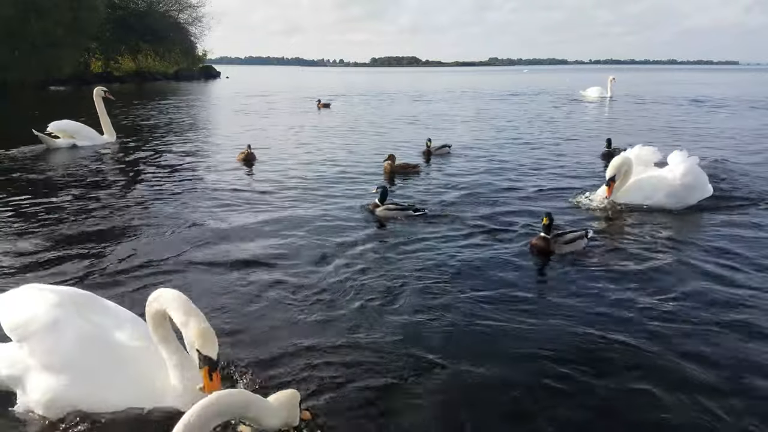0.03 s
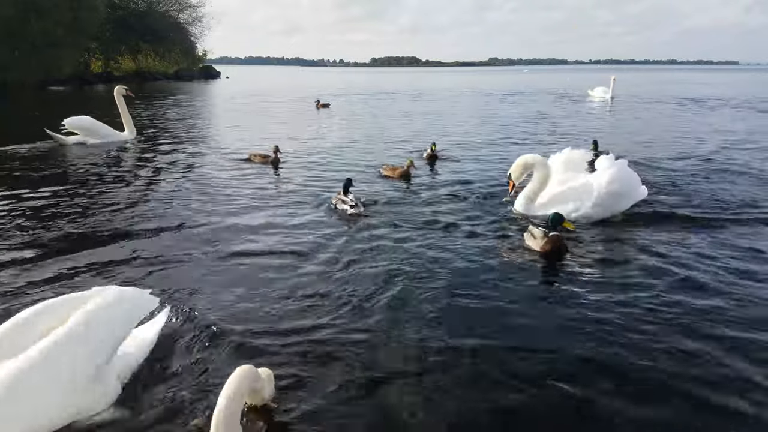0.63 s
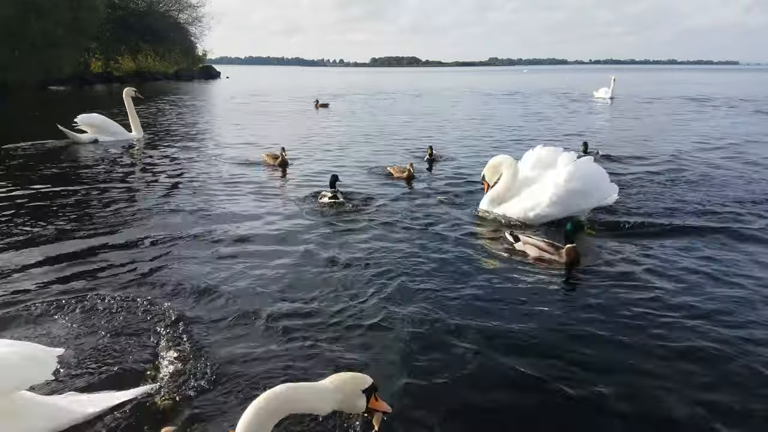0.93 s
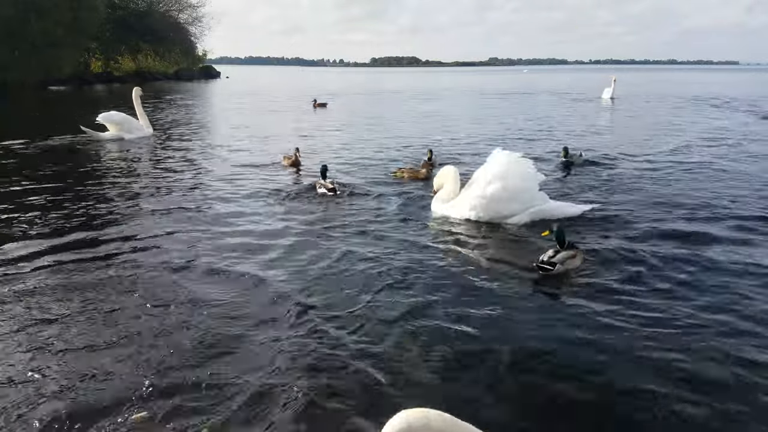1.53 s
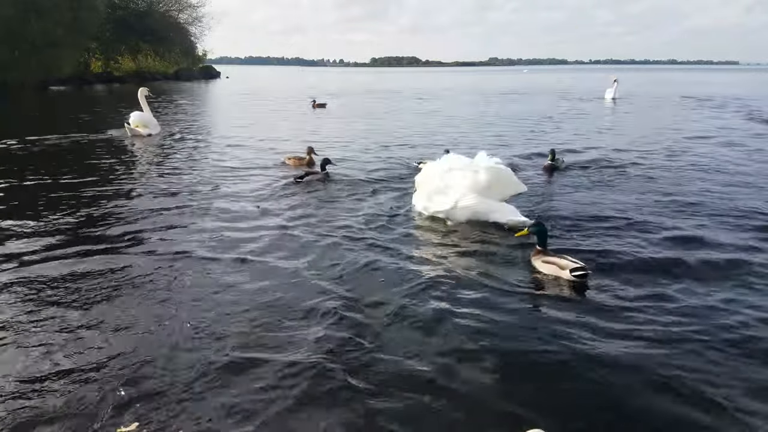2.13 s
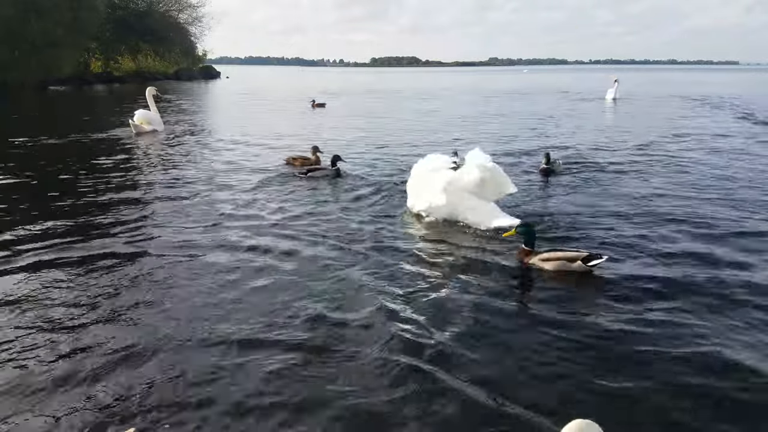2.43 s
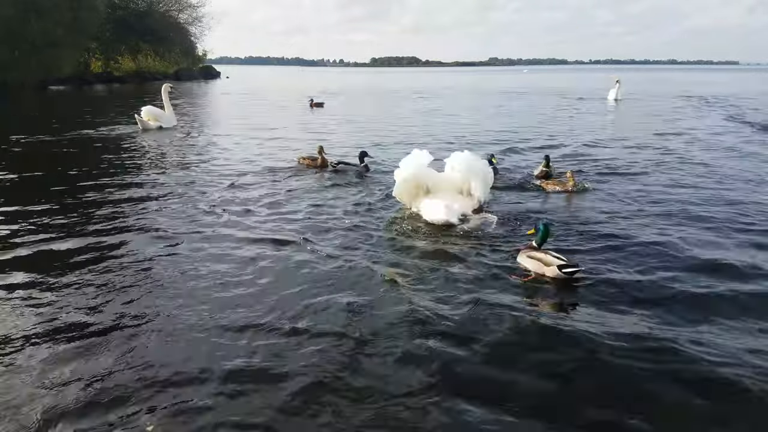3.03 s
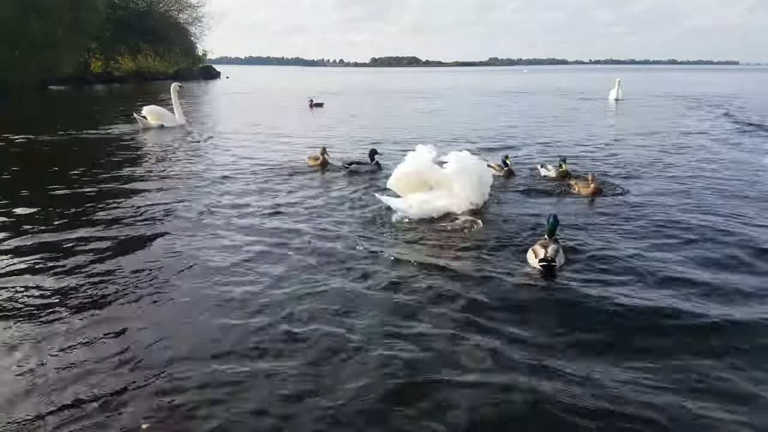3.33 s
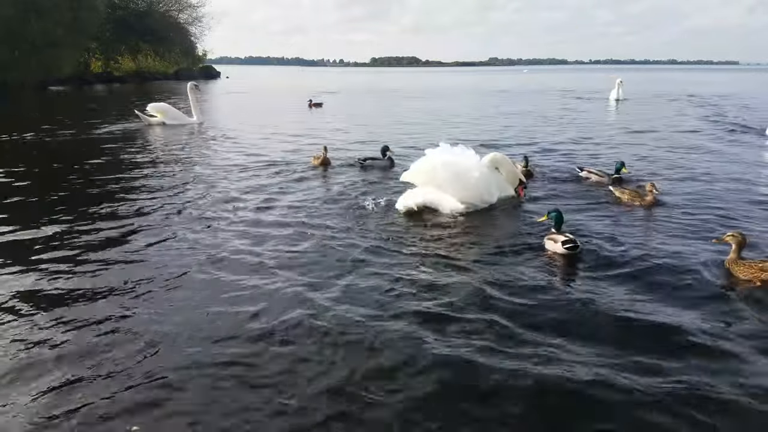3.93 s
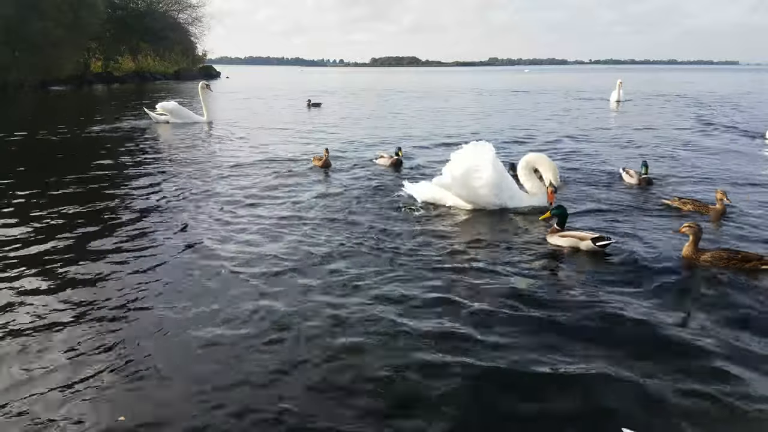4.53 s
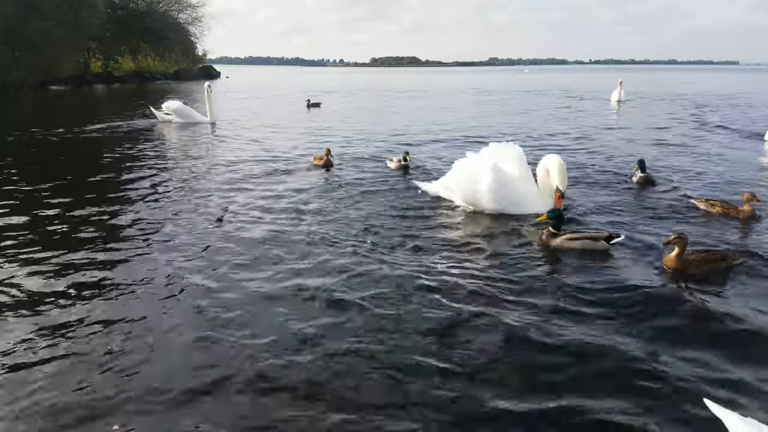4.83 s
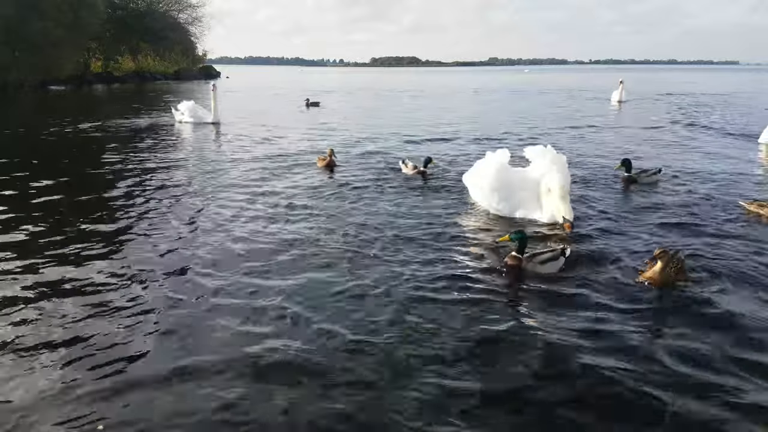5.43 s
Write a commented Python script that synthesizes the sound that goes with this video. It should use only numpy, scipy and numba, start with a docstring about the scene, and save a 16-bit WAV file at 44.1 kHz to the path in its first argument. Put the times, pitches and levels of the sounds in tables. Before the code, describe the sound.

Lake water sloshes, plops and drips around swimming swans, with a far-off motor throbbing and a few soft duck mutters late on.

```python
"""A swan paddles and splashes close by on the left of a stereo microphone pair at a lake shore, then glides off.
Small waves lap a little to the right. The water sounds through bubbles that ring and rise in pitch,
slaps that trap air, and a fine crackle of droplets. Late on, a duck mutters in soft throat pulses.
A low throbbing drone, like a distant idling boat engine, swells and fades underneath,
with faint air hiss and a light breeze on the microphones."""
import sys
import numpy as np
from scipy import signal
from scipy.fft import rfft, irfft, next_fast_len
from scipy.io import wavfile
from scipy.ndimage import uniform_filter1d, map_coordinates
from numba import njit

SR = 44100
rng = np.random.default_rng(int(sys.argv[2]) if len(sys.argv) > 2 else 0)


def transcribe(signal):
    """Save signal, clipped to [-1, 1], as a 16-bit WAV file at the path in sys.argv[1]."""
    frames = np.atleast_2d(signal).T
    limited = np.clip(frames, -1, 1)
    pcm = np.round(limited * 32767).astype(np.int16)
    wavfile.write(sys.argv[1], SR, pcm)


N = 250488
TIME = np.arange(N) / SR
SWAN_LAG_MS, SHORE_LAG_MS = -.32, .1   # arrival at the left microphone after the right
CUTOFF_HZ = 16000


# how hard the water in front of the microphones is stirred: t/s, bubbling level/dB, spray level/dB
STIRRING = [(0.0, -45.5, -57), (0.14, -49, -60), (0.41, -53, -62), (0.65, -54.5, -64), (0.87, -46, -52.5),
            (1.2, -53.5, -59.5), (1.55, -51.5, -59.5), (1.75, -52.5, -65), (2.12, -57, -61.5),
            (2.8, -52, -57.5), (3.61, -56.5, -63), (3.94, -55, -58.5), (4.26, -61.5, -62), (4.9, -68, -71),
            (5.68, -65.5, -69)]
def churn(surge_db=2.23, surges_per_s=9):
    """Stirred water bubbles, sloshes and throws spray close by, surging with the ripples."""
    stir_db, spray_db = in_time(STIRRING)
    small_db = stir_db + 1.9 + surge_db * flutter(surges_per_s)
    large_db = -61 + 9.5 * swan_near(TIME) + .34 * (stir_db - stir_db.mean())
    large = gurgle(370, 950, cycles=27, rise=.55, spread_db=4, count=700)
    small = gurgle(850, 5200, cycles=32, rise=.18, spread_db=4.8, count=3400)
    trickle = gurgle(2200, 3800, cycles=50, rise=.12, spread_db=4, count=1500)   # spray falling back
    near = .8 * small + .75 * slosh()
    far = from_db(-13.5) * diffuse(BUBBLE_SPECTRUM)   # blurred wash of water farther out
    thrown = from_db(3.5) * spray() + from_db(-1 + surge_db * flutter(surges_per_s)) * trickle
    return from_db(large_db) * large + from_db(small_db) * (near + far) + from_db(spray_db) * thrown


# tone of bubbling water: f/Hz, level/dB
BUBBLE_SPECTRUM = [(190, 6), (330, -11), (376, -3.5), (463, 1), (636, 1.5), (1240, -0.5), (1940, -1),
                   (2190, -4.5), (2940, -6.5), (4500, -16), (5850, -18.5), (9900, -120)]
def gurgle(low_hz, high_hz, cycles, rise, spread_db, count):
    """A steady stream of bubbles of random size, pitch and ring length; level about 1."""
    when, pitch, climb = rng.random((3, count))
    size, damping = rng.standard_normal((2, count))
    born = when * N / SR
    hz = low_hz * (high_hz / low_hz) ** pitch
    height = from_db(at_hz(BUBBLE_SPECTRUM, hz) + spread_db * np.minimum(size, 2)) * hz / low_hz
    t60 = cycles / hz * from_db(4 * np.clip(damping, -2, 2))
    return evened(ring_bubbles(born, height, hz, t60, rise * climb, bearings(born)), seconds=.81)


def slosh(spurt_db=2.3, spurts_per_s=60):
    """Water tumbles at the swan and at the shore: spurts of bubbles too dense to tell apart; rms 1."""
    out, swan = np.zeros((2, N)), swan_share(TIME)
    for share, lag_ms in ((swan, SWAN_LAG_MS), (1 - swan, SHORE_LAG_MS)):
        spurts = rng.standard_normal(N) * from_db(spurt_db * np.minimum(flutter(spurts_per_s), 2))
        add(out, coloured(spurts * np.sqrt(share), BUBBLE_SPECTRUM), 0, lag_ms)
    return rms_one(out)


# tone of droplets at close range: f/Hz, level/dB
SPRAY_SPECTRUM = [(2000, -17), (3500, -4), (5200, -7), (7300, -5), (8450, -2), (9700, -6), (12900, -3),
                  (16000, -10.5)]
def spray(count=2600, spread_db=6, octaves=2):
    """Tiny droplets and bursting bubbles tick, each at its own pitch, over a fine fizz."""
    when, pitch, size = rng.random((3, count))
    born = when * N / SR
    hz = CUTOFF_HZ / 2 ** (octaves * pitch ** 1.5)
    height = from_db(spread_db * np.minimum(-np.log(1 - size), 2.6))
    t60 = .0016 * rng.uniform(.2, 1.8, count)
    ticks = ring_bubbles(born, height, hz, t60, np.zeros(count), bearings(born))
    crackle = evened(coloured(ticks, SPRAY_SPECTRUM), seconds=.25)
    fizz = diffuse(SPRAY_SPECTRUM) * from_db(3.5 * flutter(90))
    return .75 * (crackle + fizz) * from_db([[.5], [-.5]])   # a little louder on the swan's side


# large air pockets gulped under by paddling: t/s, level/dB, f/Hz
AIR_POCKETS = [(.05, -34.5, 488), (.44, -35.5, 546), (.655, -33, 840), (.815, -31.5, 603), (.965, -39, 806),
               (1.085, -41, 393), (1.16, -36, 554), (1.3, -41, 720), (1.535, -46, 710), (1.778, -38, 438),
               (3.284, -43, 401), (3.82, -41, 657)]
def glugs(cycles=52.6, rise=.6):
    """A big bubble rings low and glides upward as it rises."""
    s, level_db, hz = np.array(AIR_POCKETS).T.copy()
    return ring_bubbles(s, from_db(level_db), hz, cycles / hz, np.full(len(s), rise), bearings(s))


# slaps that trap one air pocket: t/s, relative level/dB, f/Hz, ring t60/s, smack offset/dB
SLAPS = [(0.1374, -24.5, 1990, 0.03, -4.5), (0.182, -23.5, 1020, 0.034, -7.5),
         (0.305, -25, 1100, 0.014, -16), (0.3366, -23.5, 1580, 0.014, -9), (0.521, -18.5, 1070, 0.014, -26),
         (0.681, -29, 710, 0.031, -12), (0.7792, -25, 594, 0.042, -6), (0.8265, -27.5, 597, 0.024, -4),
         (0.8934, -25, 665, 0.031, -23), (1.0362, -27, 3080, 0.02, -3), (1.056, -30.5, 3200, 0.022, -4),
         (1.675, -30, 1860, 0.014, -24), (1.6863, -29, 2150, 0.012, 0), (1.7209, -29, 1440, 0.018, -19),
         (1.757, -31.5, 1290, 0.012, 10.5), (1.7723, -29, 1014, 0.056, -3), (1.862, -34, 1680, 0.022, 8.5),
         (1.9255, -22, 740, 0.017, -4.5), (2.1147, -12, 1440, 0.01, -8), (2.137, -26.5, 1870, 0.045, -10),
         (2.1663, -25.5, 1420, 0.034, -7), (2.312, -22.5, 1390, 0.011, -3), (2.325, -30.5, 1660, 0.013, 3),
         (2.3545, -38, 1130, 0.01, 4), (2.4767, -25, 754, 0.014, -15), (2.664, -35, 1100, 0.01, 7.5),
         (2.8878, -33, 830, 0.03, 2.5), (3.269, -28.5, 1500, 0.0047, -0.5),
         (3.468, -30.5, 2470, 0.037, -23), (3.805, -29.5, 942, 0.052, -8.5),
         (4.4966, -34.5, 1210, 0.081, -0.5), (4.9222, -38.5, 1860, 0.015, -4.5),
         (5.2256, -43.5, 1960, 0.038, 1.5), (5.376, -30.5, 1475, 0.044, -12),
         (5.4636, -27.5, 1734, 0.045, -25), (5.6645, -27.5, 720, 0.01, -9)]
# tone of the smack: f/Hz, level/dB
SMACK_SPECTRUM = [(200, -30), (500, -4.5), (1000, -7), (1800, -1.5), (3000, -6), (4500, -12.5), (9000, -29),
                  (16000, -37)]
def plops(ring_gain_db=-5, smack_gain_db=1.5, rise=.17, spatter_t60=.028):
    """Water slaps shut with one push and a short spatter, and the trapped air rings."""
    s, level_db, hz, t60, smack_db = np.array(SLAPS).T.copy()
    lag_ms = SHORE_LAG_MS + .6 * (SWAN_LAG_MS - SHORE_LAG_MS) * swan_near(s)   # drawn toward the swan
    out = ring_bubbles(s, from_db(level_db + ring_gain_db), hz, t60, np.full(len(s), rise), lag_ms)
    t = TIME[:SR // 20]
    pushes = .41 * rng.standard_normal((len(s), len(t))) * from_db(-60 * t / spatter_t60)
    pushes[:, 0] = 2   # the push, ahead of its spatter
    peaks = from_db(level_db + smack_db + smack_gain_db)
    for k, smack in enumerate(coloured(pushes, SMACK_SPECTRUM)):
        add(out, smack / np.abs(smack).max() * peaks[k], s[k], lag_ms[k])
    return out


# the loudest drops hitting the lake: t/s, peak level/dB, left over right/dB
LOUD_DROPS = [(0.0353, -30, -4), (0.0574, -27, 3), (0.138, -23.5, 0), (0.1594, -30, 3), (0.255, -30.5, 3.5),
              (0.2994, -26, 3), (1.579, -31, 11), (1.7578, -26, -4), (1.8587, -29.5, -1), (1.9988, -27, -3),
              (2.2383, -35, 7), (2.369, -22, 3), (2.3883, -28, 2), (2.887, -27, -5), (3.7415, -31.5, -1),
              (3.8336, -27.5, 0), (3.9356, -30.5, 0), (4.0376, -29, 0), (4.7695, -36.5, 0), (5.225, -38, 0),
              (5.4163, -31.5, 0), (5.6657, -36.5, 12)]
def drops(drip_count=18, t60=.008):
    """A drop meets the surface with a bright tick; lesser drips fall at random, following the spray level."""
    drip_s = rng.random(drip_count) * N / SR
    drip_db = in_time(STIRRING, drip_s)[1] + 18.5
    drip_pan_db = rng.uniform(-9.6, 6, drip_count)
    rows = np.vstack([LOUD_DROPS, np.transpose([drip_s, drip_db, drip_pan_db])])
    out, t = np.zeros((2, N)), TIME[:SR // 40]
    ticks = coloured(rng.standard_normal((len(rows), len(t))) * from_db(-60 * t / t60), SPRAY_SPECTRUM)
    for tick, (s, peak_db, pan_db), lag_ms in zip(ticks, rows, bearings(rows[:, 0])):
        add(out, tick / np.abs(tick).max() * from_db(peak_db), s, lag_ms, pan_db)
    return out


def swan_near(s, leaves_s=1.11, fade_s=.16):
    """1 while the swan paddles close to the microphones, 0 once it has glided off."""
    return np.clip(1 - (s - leaves_s) / fade_s, 0, 1)


def swan_share(s, near=.6, away=.42):
    """Share of the bubbles that come from the swan's side."""
    return away + (near - away) * swan_near(s)


def bearings(born, scatter_ms=.066):
    """Lag in ms between the microphones: each bubble or drop comes from the swan or from the shore."""
    by_swan = rng.random(len(born)) < swan_share(born)
    return np.where(by_swan, SWAN_LAG_MS, SHORE_LAG_MS) + scatter_ms * rng.standard_normal(len(born))


@njit
def ring_bubbles(born, height, hz, t60, rise, lag_ms):
    """Each bubble is a dying sine whose pitch climbs by the share 'rise' as it nears the surface."""
    out = np.zeros((2, N))
    for k in range(len(born)):
        for mic in range(2):
            start = born[k] + (.5 - mic) * lag_ms[k] / 1000
            for i in range(max(0, int(start * SR) + 1), min(N, int((start + t60[k]) * SR))):
                t = i / SR - start
                age, turns = t / t60[k], hz[k] * t
                envelope = height[k] * min(1., 1.5 * turns) * np.exp(-6.9 * age)
                out[mic, i] += envelope * np.sin(2 * np.pi * turns * (1 + rise[k] * age / 2))
    return out


# wavelets folding over at the water's edge: t/s, relative level/dB, centre f/Hz
WAVELETS = [(0.02, -35, 1530), (0.061, -36, 1880), (.16, -35, 2030), (0.356, -35.5, 1730),
            (0.558, -37.5, 2180), (.69, -39, 975), (0.782, -41, 1500), (0.825, -36.5, 1910),
            (0.961, -41.5, 1890), (1.201, -36.5, 1630), (1.46, -50, 2470), (1.654, -41.5, 2440),
            (1.78, -42, 1990), (1.871, -38.5, 1600), (1.918, -35.5, 1750), (2.149, -41.5, 1950),
            (2.334, -48, 2330), (2.464, -40, 1920), (2.697, -39, 1500), (2.875, -45, 1670),
            (3.321, -37.5, 1740), (3.629, -40, 2000), (3.829, -40, 1590), (3.931, -45.5, 2330),
            (4.09, -43.5, 2780), (4.34, -44, 2980)]
FOLD_S = .05
def laps(count=40, gain_db=-4.5, spread_db=3, octaves=.444, cycles=24, rise=.22):
    """A folding wavelet sheds a swarm of short-lived bubbles, the later ones smaller and higher."""
    s, level_db, centre_hz = np.repeat(np.array(WAVELETS), count, axis=0).T
    early, late = rng.random((len(s), 2)).T
    pitch, size = np.clip(rng.standard_normal((len(s), 2)), -1.6, 1.6).T
    progress = early - late   # densest in the middle of the fold
    born = s + .63 * FOLD_S * progress
    hz = centre_hz * 2 ** (octaves * pitch + .26 * progress)
    height = from_db(level_db + gain_db + spread_db * size)
    return ring_bubbles(born, height, hz, cycles / hz, rise * rng.random(len(s)), bearings(born))


def lap_wash(gain_db=-11.5, spray_db=-7.5):
    """The thin sheet of each wavelet runs out as a short swelling wash that throws a little spray."""
    swell = sum(from_db(db) * np.exp(-(2 * (TIME - s) / FOLD_S) ** 2) for s, db, _ in WAVELETS)
    return swell * from_db(gain_db) * (slosh() + from_db(spray_db) * spray())


# a duck on the shore side: t/s, length/s, relative level/dB, f/Hz, pulse rate/Hz
DUCK_CALLS = [(4.543, .055, -40, 1300, 88), (4.803, .052, -40, 980, 110), (5.073, .07, -43, 1220, 78),
              (5.525, .05, -43, 1200, 62)]
def duck(gain_db=-2, chirp_s=.018, rise=.7, rasp=.35, jitter=.16):
    """Each soft call is a few uneven throat pulses, every one a quick upward chirp with a little rasp."""
    out, t = np.zeros((2, N)), TIME[:SR // 50]
    envelope = t * from_db(-75 * t / chirp_s)
    envelope /= envelope.max()
    for s, length, level_db, hz, per_s in DUCK_CALLS:
        for k, (late, detune) in enumerate(rng.standard_normal((8, 2))):
            after = (k + jitter * late) / per_s
            progress = np.clip(.13 + .95 * after / length, 0, 1)
            swell = np.sqrt(max(0, np.sin(np.pi * progress)))
            chirp = np.sin(2 * np.pi * hz * (1 + .185 * detune) * t * (1 + rise * t / chirp_s / 2))
            hiss = rms_one(coloured(rng.standard_normal(len(t)), SMACK_SPECTRUM))
            pulse = (chirp + rasp * hiss) * envelope
            add(out, from_db(level_db + gain_db) * swell * pulse, s + after, SHORE_LAG_MS)
    return out


# lines of the distant engine: multiple of the cycle rate, relative level/dB
ENGINE_LINES = [(6, -25), (9, -32), (11, -26), (12, 0), (13, -14), (14, -25), (15, -13), (16, -22),
                (17, -23), (18, -32), (19, -34), (20, -26), (21, -22), (22, -36), (23, -25), (24, -37),
                (26, -44), (30, -38), (32, -42)]
# its rumble: f/Hz, level/dB
RUMBLE_SPECTRUM = [(15, -40), (33, -25), (52, 4.5), (80, 4), (130, 5.5), (190, 0), (240, -10.5), (320, -15),
                   (500, -26), (900, -94)]
def engine(cycle_hz=8.567, rumble_db=-14, hum_hz=291, hum_db=-64):
    """Uneven firings put lines at multiples of the cycle rate; they beat into a throb over a rumble."""
    turns = cycle_hz * TIME + .003 * flutter(2)
    lines = sum(from_db(db) * np.sin(2 * np.pi * (order * turns + rng.random()))
                for order, db in ENGINE_LINES)
    throb = np.zeros((2, N))
    add(throb, rms_one(lines), 0, lag_ms=-.62, pan_db=-1.4)
    rumble = from_db(rumble_db) * diffuse(RUMBLE_SPECTRUM)
    steady_hum = from_db(hum_db) * np.sqrt(2) * np.sin(2 * np.pi * hum_hz * TIME)
    return engine_swell() * (throb + rumble) + steady_hum


def engine_swell(quiet_db=-45, full_db=-32.5, from_s=.16, rise_s=.56, until_s=4.82, fade_s=.59):
    """The drone swells, holds and fades."""
    swell = np.clip(np.minimum((TIME - from_s) / rise_s, 1 - (TIME - until_s) / fade_s), 0, 1)
    return from_db(quiet_db + (full_db - quiet_db) * swell)


# open air over the lake: f/Hz, level/dB
AIR_SPECTRUM = [(140, -28.5), (230, 4.5), (280, -1), (334, 1.5), (655, -7.5), (783, -4.5), (1870, -16.5),
                (4010, -33), (6950, -49), (8450, -52), (9910, -41), (14900, -20.5), (16000, -28)]
def air(level_db=-58.5):
    """A faint steady hiss reaches the microphones from all around."""
    return from_db(level_db) * diffuse(AIR_SPECTRUM)


# wind on the microphones: f/Hz, level/dB; then its mean level/dB
WIND_COLOUR, WIND_DB = [(10, 7), (25, 8), (45, -10), (90, -17), (200, -43.5)], -63
def breeze(gust_db=2.1, gusts_per_s=6.5):
    """A light breeze rumbles on each microphone separately."""
    gusts = from_db(WIND_DB + gust_db * flutter(gusts_per_s))
    return gusts * rms_one(coloured(rng.standard_normal((2, N)), WIND_COLOUR))


# likeness of sound from all around at the two microphones: f/Hz, coherence/0-1
COHERENCE = [(60, 1), (150, 0.95), (300, 0.81), (640, 0), (1400, 0), (3000, 0)]
def diffuse(spectrum):
    """Stereo noise from all around, alike at both microphones only in the bass; rms 1."""
    size = 2 * next_fast_len(N // 2 + 1)
    hz = np.fft.rfftfreq(size, 1 / SR)
    alike = at_hz(COHERENCE, hz)
    mid, side = rfft(rng.standard_normal((2, size)))
    pair = np.sqrt(1 + alike) * mid + np.sqrt(1 - alike) * side * [[1], [-1]]
    return rms_one(irfft(pair * from_db(at_hz(spectrum, hz)))[:, :N])


def from_db(db):
    return 10 ** (np.asarray(db) / 20)


def rms_one(x):
    return x / np.sqrt(np.mean(x ** 2) + 1e-20)


def in_time(rows, at=TIME):
    """The columns of a curve table at the given times."""
    s, *columns = np.transpose(rows)
    return [np.interp(at, s, c) for c in columns]


def at_hz(points, hz):
    """A spectrum table read on a log-frequency axis."""
    freqs, values = np.transpose(points)
    return np.interp(np.log(np.maximum(hz, 1)), np.log(freqs), values)


def coloured(x, spectrum):
    """Causal (minimum-phase) filter with the given spectrum."""
    size = next_fast_len(x.shape[-1] + SR // 10) * 2
    cepstrum = irfft(np.log(from_db(at_hz(spectrum, np.fft.rfftfreq(size, 1 / SR)))))
    cepstrum[1:size // 2] *= 2
    cepstrum[size // 2 + 1:] = 0
    return irfft(rfft(x, size) * np.exp(rfft(cepstrum)))[..., :x.shape[-1]]


def flutter(rate):
    """A random curve that changes about 'rate' times a second; rms 1."""
    knots = rng.standard_normal(N // 20)
    return rms_one(map_coordinates(knots, [TIME * rate], order=1, mode="wrap"))


def evened(x, seconds):
    """Hold the slow level near 1 and leave the grains standing out."""
    power = uniform_filter1d(np.mean(x ** 2, axis=0), int(seconds * SR))
    return x / np.sqrt(uniform_filter1d(power, int(seconds * SR)) + .01 * power.mean())


def add(out, sound, s, lag_ms, pan_db=0):
    """Mix a sound in, reaching the left microphone lag_ms after the right and pan_db louder."""
    for mic, sign in enumerate((1, -1)):
        start = max(0, round((s + sign * lag_ms / 2000) * SR))
        part = sound[:max(0, N - start)]
        out[mic, start:start + len(part)] += part * from_db(sign * pan_db / 2)


def scene():
    """Open water gives no echo: near and distant sources simply add at the microphones."""
    water = churn() + laps() + lap_wash() + glugs() + plops() + drops()
    return water + duck() + engine() + air() + breeze()


def record(dry):
    """A steep low-pass cuts the top of both channels."""
    return signal.sosfilt(signal.ellip(10, .2, 80, CUTOFF_HZ, fs=SR, output="sos"), dry)


dry = scene()
out = record(dry)
transcribe(out)
```